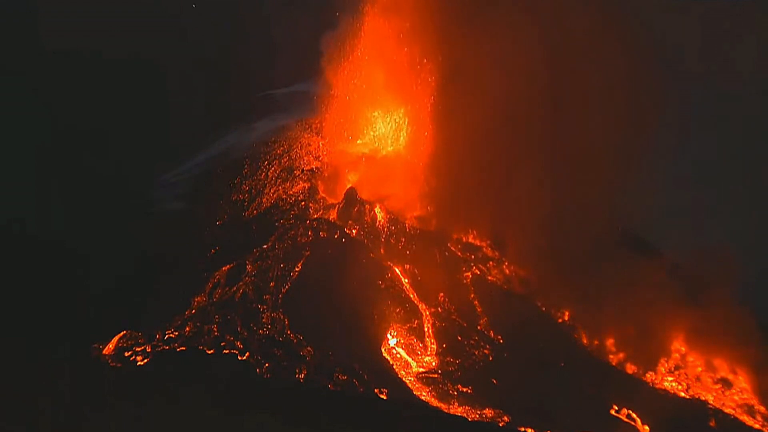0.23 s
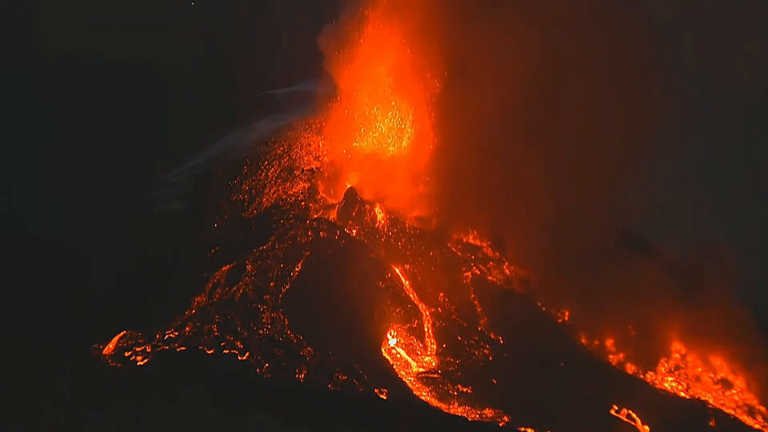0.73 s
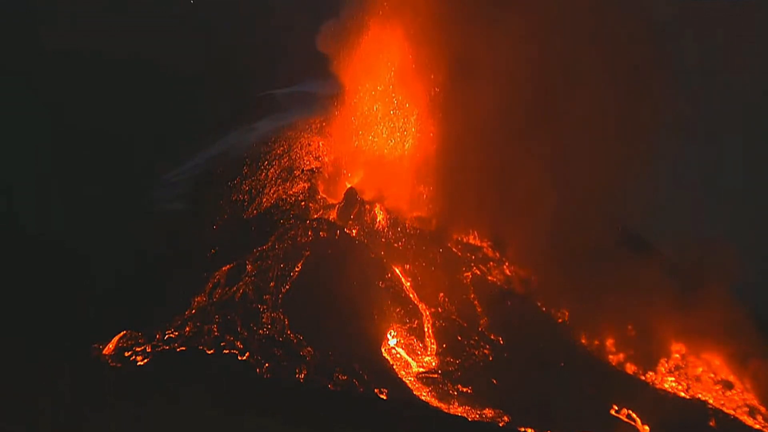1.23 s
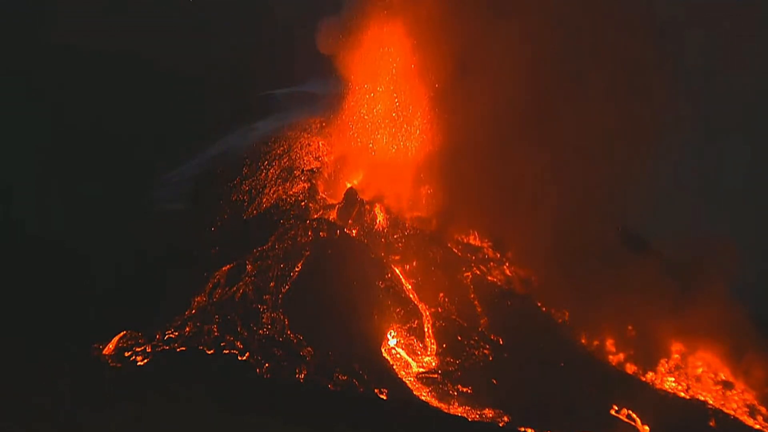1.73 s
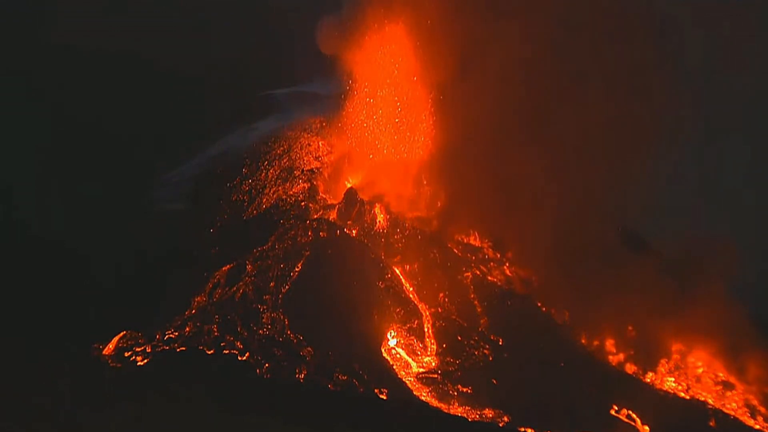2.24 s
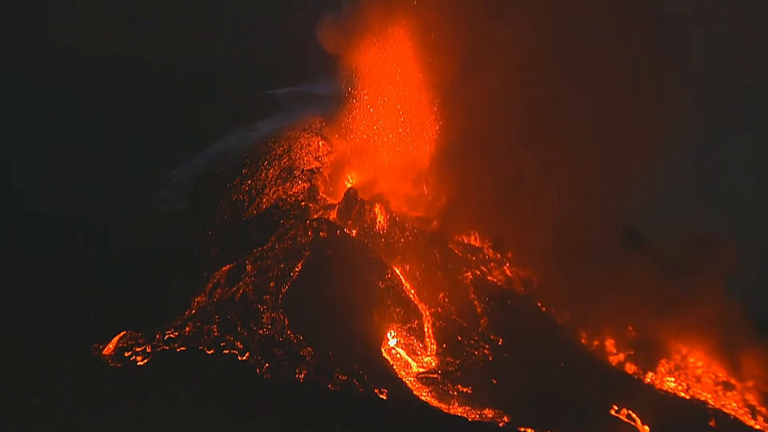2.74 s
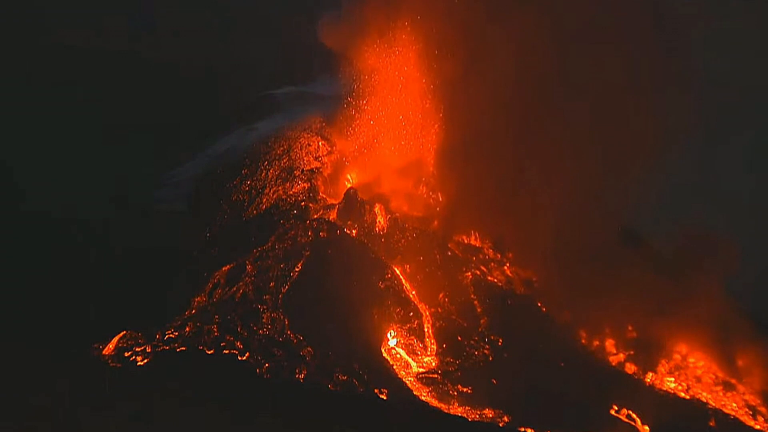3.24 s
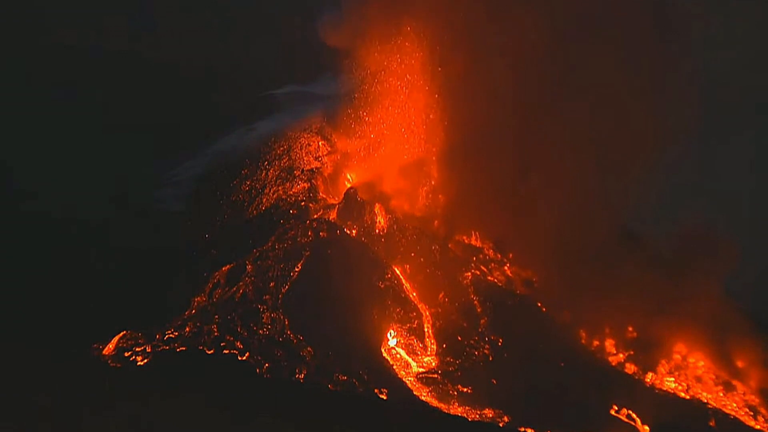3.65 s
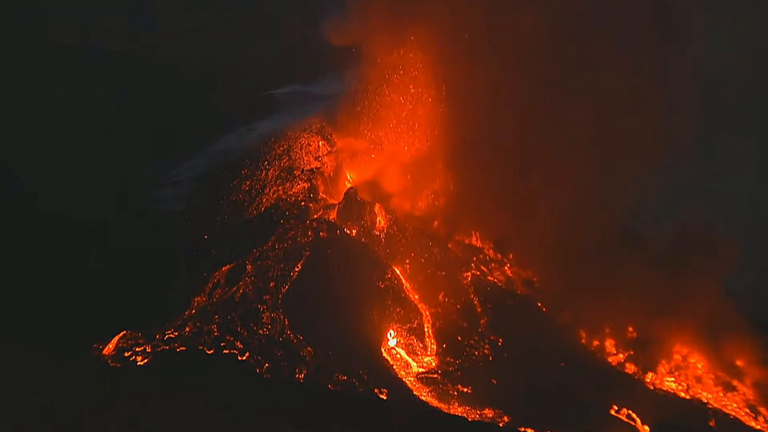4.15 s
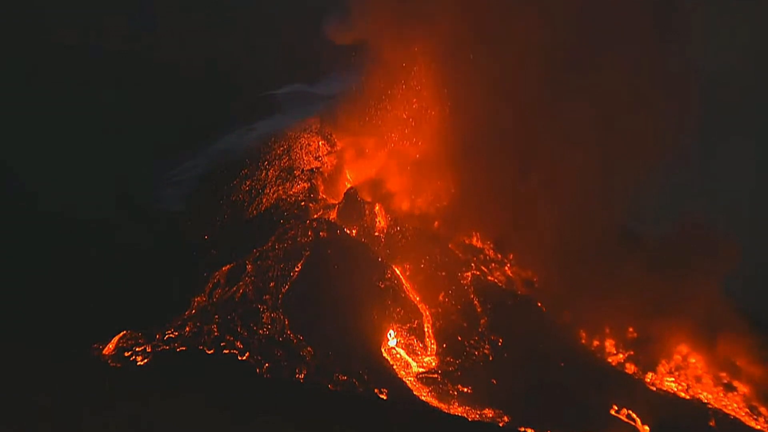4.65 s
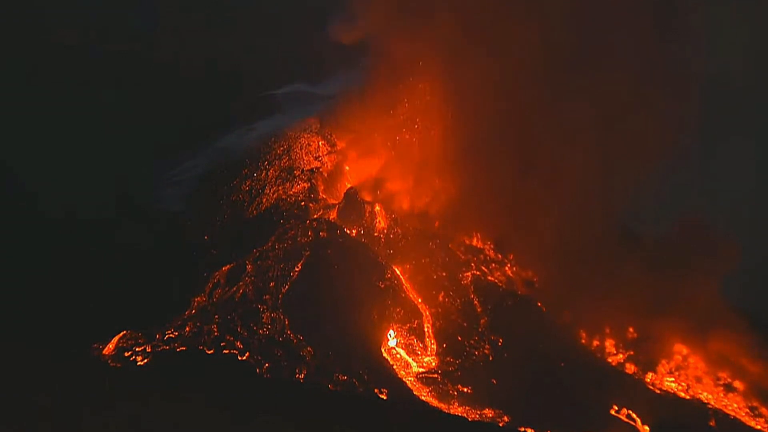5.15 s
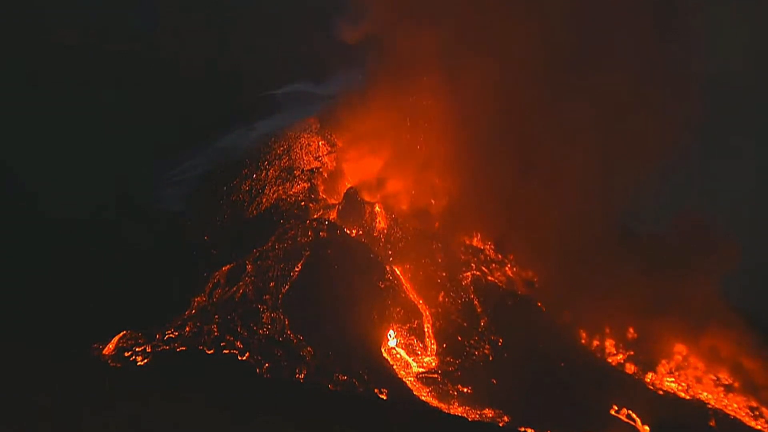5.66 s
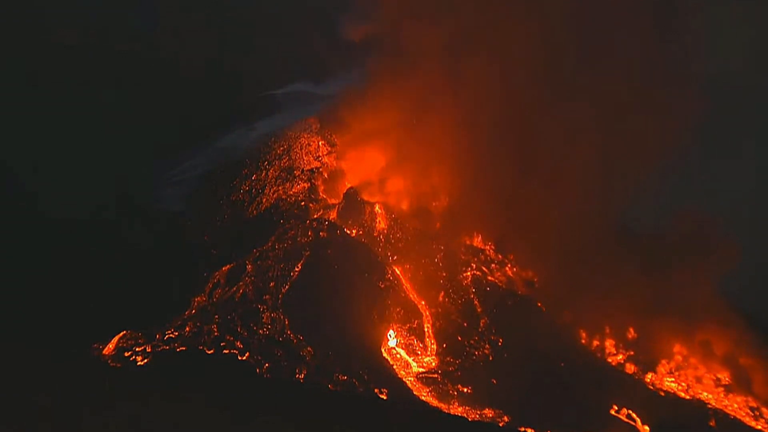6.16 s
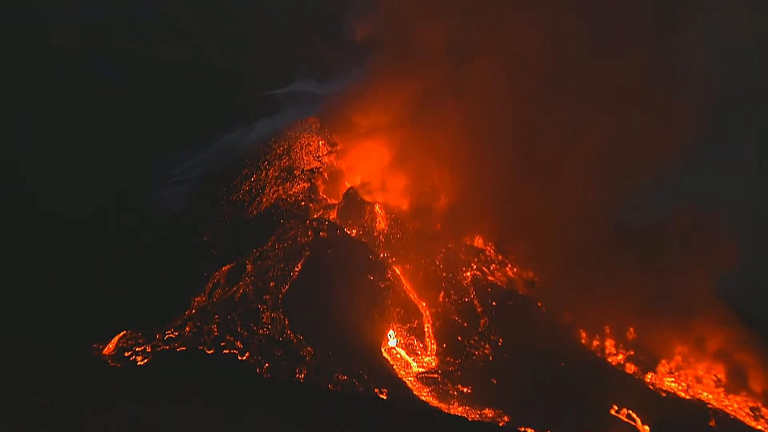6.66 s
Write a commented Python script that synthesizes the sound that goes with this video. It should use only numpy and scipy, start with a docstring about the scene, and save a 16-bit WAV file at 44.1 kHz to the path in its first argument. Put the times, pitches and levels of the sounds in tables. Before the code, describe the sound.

A distant volcano roars steadily with deep booming surges, while faint cinders patter and tick on top.

```python
"""Distant lava fountain at night

Escaping gas booms in a volcano's vent and roars above it; a cluster of short echoes spreads the
roar left and right. Air has soaked up the treble: only a faint patter of cinders with brief
crackling showers, a few small ticks and squeaks and a thin hiss lie on top."""
import sys
import numpy as np
from scipy import signal
from scipy.fft import rfft, irfft
from scipy.io import wavfile
from scipy.ndimage import uniform_filter1d

SR = 44100
rng = np.random.default_rng(int(sys.argv[2]) if len(sys.argv) > 2 else 0)


def store_pcm(level_fs):
    """Save levels as 16-bit WAV."""
    pcm = np.round(np.clip(level_fs, -1, 1) * 32767).astype(np.int16)
    wavfile.write(sys.argv[1], SR, np.atleast_2d(pcm).T)


N = 304731
TIME = np.arange(N) / SR
FREQS = np.maximum(np.fft.rfftfreq(N, 1 / SR), 1)


def undb(db):
    """Decibels to gain."""
    return 10 ** (np.asarray(db) / 20)


def unit(x):
    """Scale to rms 1."""
    return x / np.sqrt(np.mean(x ** 2))


def automation(points):
    """A level curve through (time, level) points, joined by straight lines."""
    return np.interp(TIME, *np.transpose(points))


def colour(points):
    """An EQ curve: gain at every frequency from (frequency [Hz], level [dB]) points."""
    hz, db = np.transpose(points)
    return undb(np.interp(np.log(FREQS), np.log(hz), db))


def resonance(hz, width):
    """Gain of a steep-sided resonance, 1 at its centre."""
    return 1 / (1 + ((FREQS ** 2 - hz ** 2) / (FREQS * width * np.pi / 2)) ** 2)


def peak_bank(rows):
    """Joint gain of several steep-sided peaks, added in power."""
    return np.sqrt(sum((undb(db) * resonance(hz, width)) ** 2 for hz, width, db in rows))


def noise(gain):
    """Noise of rms 1, its spectrum shaped by gain."""
    phases = np.exp(2j * np.pi * rng.random(len(FREQS)))
    return unit(irfft(gain * phases, N))


def sustained(x, span_s):
    """Level a signal so that its power stays even over spans longer than span_s."""
    size = max(int(span_s * SR), 1)
    power = uniform_filter1d(uniform_filter1d(x ** 2, size), size)
    return x / np.sqrt(power)


def walk(rate_hz):
    """Smooth random drift of rms 1: random steps at rate_hz, slewed twice."""
    hold = int(SR / rate_hz)
    steps = np.repeat(rng.standard_normal(N // hold + 1), hold)
    return unit(uniform_filter1d(uniform_filter1d(steps, hold), hold)[:N])


def hiss():
    """A thin, steady bed of treble noise."""
    # tone of the hiss: (frequency [Hz], relative level [dB])
    hiss_eq = [(2000, -17.5), (5000, -3.5), (5900, -9), (6600, -14), (7500, -6), (8600, -0.5), (9600, -7.5),
               (10500, -4.5), (11500, -3), (12800, 3.5), (15000, 1), (16000, -5.5)]
    return undb(-74.5) * noise(colour(hiss_eq))


def squeaks():
    """Short, thin, unsteady tones that swell, glide a little and fade."""
    # faint squeaks, some in a stutter: (start [s], length [s], level [dB], from pitch [Hz], to pitch [Hz])
    glides = [(1.588, 0.068, -69, 3400, 3390), (1.683, .03, -70, 3410, 3430), (1.696, .07, -71, 2940, 3000),
              (1.721, .017, -67, 3400, 3390), (1.742, .016, -67, 3390, 3430),
              (1.758, 0.02, -72, 3400, 3400)]
    jitter_hz, flutter_db = 28 * walk(500), 2 * walk(160)
    out = np.zeros(N)
    for start, length, db, from_hz, to_hz in glides:
        progress = np.clip((TIME - start) / length, 0, 1)
        pitch_hz = from_hz + (to_hz - from_hz) * progress + jitter_hz
        phase = 2 * np.pi * np.cumsum(pitch_hz) / SR
        out += undb(db + flutter_db) * np.sin(np.pi * progress) * np.sin(phase)
    return out


def ticks():
    """Each tick is a bright snap of contact and a short ring in one steep-sided resonance."""
    # small impacts: (time [s], ring level [dB], pitch [Hz], nominal width [Hz], decay [s], snap level [dB])
    impacts = [(.124, -55.5, 2850, 1150, 0.0052, -72), (.172, -71, 3900, 350, 0.022, -76),
               (.336, -69, 3050, 900, .011, -82), (.422, -66.5, 2980, 320, 0.018, -90),
               (.463, -74, 3450, 300, 0.035, -91), (1.12, -72.5, 3400, 450, 0.018, -85),
               (2.705, -70, 3450, 350, 0.01, -85), (2.87, -56, 2450, 1200, 0.0035, -63),
               (2.883, -69.5, 3300, 1000, 0.0044, -81), (4.824, -70, 3600, 354, 0.011, -92),
               (6.09, -76, 3600, 1210, 0.027, -82)]
    attack_s, snap_decay_s = 0.00019, 0.002
    snap_noise = sustained(noise(resonance(hz=4600, width=1350) ** 2), span_s=0.002)
    out = np.zeros(N)
    for start, ring_db, hz, width, decay_s, snap_db in impacts:
        age = np.maximum(TIME - start, 0)
        ring_noise = sustained(noise(resonance(hz, width) ** 2), span_s=0.0037)
        ring = undb(ring_db) * ring_noise * np.exp(-age / decay_s)
        snap = undb(snap_db) * snap_noise * np.exp(-age / snap_decay_s)
        out += (ring + snap) * (1 - np.exp(-age / attack_s))
    return out


def cinders():
    """Falling cinders blur into a fine, uneven patter; coarser showers crackle over it and die away."""
    # tone of the patter: (frequency [Hz], relative level [dB])
    patter_eq = [(1200, -12.5), (2300, 2), (2800, -0.5), (3400, 1.5), (3900, -3), (4500, -10.5),
                 (5600, -20), (7000, -49)]
    # tone of the showers: (frequency [Hz], relative level [dB])
    shower_eq = [(1200, -8.5), (2000, 6.5), (2500, 2.5), (3000, 1.5), (3800, -3.5), (4500, -11.5),
                 (5500, -20.5), (7000, -48)]
    # sudden showers of cinders: (start [s], level [dB], decay [s])
    showers = [(.16, -59.5, 0.058), (.325, -69, 0.07), (1.7, -70, .07), (1.76, -69.5, .04), (2.35, -72, .2),
               (2.86, -69.5, 1.1), (3.17, -74.5, .5)]
    patter_db, attack_s, stones_per_s = -76.5, 0.006, 1700
    shower_power = np.zeros(N)
    for start, db, decay_s in showers:
        age = np.maximum(TIME - start, 0)
        envelope = undb(db) * (1 - np.exp(-age / attack_s)) * np.exp(-age / decay_s)
        shower_power += envelope ** 2
    patter = noise(colour(patter_eq)) * undb(patter_db + 1.2 * walk(45))
    stones = np.sign(rng.standard_normal(N)) * (rng.random(N) < stones_per_s / SR)
    crackle = unit(irfft(rfft(stones) * colour(shower_eq), N))
    return patter + crackle * np.sqrt(shower_power)


def weak_echoes(age, count, first_s, last_s):
    """Taps for one side: equally weak reflections at random delays."""
    arrivals = rng.uniform(first_s, last_s, count)
    return undb(-24.5) * np.bincount(np.searchsorted(age, arrivals), minlength=len(age))


def echoes(x, distinct_db, scatter_db, onset_s, t60_s):
    """Distinct reflections and a scattered tail, different on each side; the bass stays in the centre."""
    # the clearest echoes: (delay [ms], channel [0 left, 1 right], relative level [dB])
    reflections = [(10.16, 0, -18), (17.26, 0, -14), (20.2, 1, -17), (22.47, 1, -17), (25.68, 0, -16),
                   (30.27, 1, -18), (34.58, 0, -18), (35.19, 1, -18)]
    # tone of the tail: (frequency [Hz], relative level [dB])
    tail_eq = [(60, -57), (150, -37.5), (245, -7), (300, -8.5), (390, -8.5), (500, 0), (680, 4), (820, 5.5),
               (1200, -2.5), (2000, 1), (3300, -7.5), (7000, -16)]
    age = TIME[:SR // 3]
    taps = np.array([weak_echoes(age, count=8, first_s=0.009, last_s=0.036) for side in range(2)])
    for ms, channel, db in reflections:
        taps[int(channel), round(ms * SR / 1000)] += undb(db)
    midrange = signal.butter(2, [400, 2130], "band", fs=SR, output="sos")
    distinct = rfft(signal.sosfilt(midrange, taps), N)
    bloom = 1 - np.exp(-(age / onset_s) ** 2)
    tail = rng.standard_normal(taps.shape) * bloom * undb(-60 * age / t60_s)
    tail /= np.sqrt(np.sum(tail ** 2, axis=1, keepdims=True))
    scattered = rfft(tail, N) * colour(tail_eq)
    scattered -= 0.5 * scattered.mean(axis=0)  # the tail comes more from the sides than from ahead
    response = undb(distinct_db) * distinct + undb(scatter_db) * scattered
    return irfft(rfft(x) * response, N)


def jet(roar_db):
    """The gas jet's roar: big eddies follow its strength, small ones swell a bit more and flutter faster."""
    # tone of the broad roar: (frequency [Hz], relative level [dB])
    jet_eq = [(100, -46.5), (260, -0.5), (380, -3), (520, -3), (660, -3), (800, -10), (1000, -12.5),
              (1300, -16.5), (1650, -23), (2050, -29.5), (2600, -43), (4000, -55), (7000, -87)]
    # narrow, steady peaks that colour the roar: (pitch [Hz], width [Hz], level against the broad roar [dB])
    jet_peaks = [(398, 12, 4.5), (461, 12, 4), (484, 12, -2.5), (550, 30, -1), (594, 24, 1), (652, 25, 0.5),
                 (693.7, 8.5, 2.5), (760, 11, -4), (808, 33, 4), (872, 44, -0.5), (920, 10, -1),
                 (982, 8.2, 5), (1025, 11, 5.5), (1092, 16, 4.5), (1154, 10, -2), (1193, 6.3, 1.5),
                 (1257, 8.3, 2), (1284, 12, 8), (1396, 9, 0), (1420, 13, -1.5), (1490, 41, -2),
                 (1550, 14, 1), (1639, 12, 1.5), (1760, 12, -1)]
    crossover_hz = 900
    small_share = 1 / (1 + (crossover_hz / FREQS) ** 4)  # share of the power in small eddies
    tone = colour(jet_eq) * np.hypot(1, peak_bank(jet_peaks))
    mean_db = np.mean(roar_db)
    big_db = roar_db - 0.78
    small_db = mean_db + 1.1 * (roar_db - mean_db) - 9.5
    big_eddies = noise(tone * np.sqrt(1 - small_share)) * undb(big_db + 0.23 * walk(8.8))
    small_eddies = noise(tone * np.sqrt(small_share)) * undb(small_db + 0.6 * walk(24))
    return big_eddies + small_eddies


def vent(effort_db):
    """Gas rings the vent's resonances over slow, deep pressure swells; each surge booms at its own pitch."""
    # build-up of the steady boom, a narrow low resonance of the vent: (time [s], level at mean effort [dB])
    boom_build = [(0, -50.5), (1.1, -44), (1.8, -43.5), (3, -42), (6.9, -41.5)]
    # the vent's other resonances, heard as rumble: (pitch [Hz], width [Hz], relative level [dB])
    rumble_modes = [(80.4, 15, -5), (101, 37, -7.5), (113.6, 42.6, -0.5), (149.4, 14, 2), (158.5, 10, -4.5),
                    (192.9, 10, -2.5), (209, 34, -10.5), (236, 20.7, -8)]
    # gas surges: (peak time [s], length [s], rumble lift [dB], boom level [dB], pitch [Hz], width [Hz])
    surges = [(0.076, 0.14, 0, -34.5, 150.3, 13), (0.197, .35, -0.5, -39, 78.7, 11),
              (0.452, 0.24, 1, -37, 188.6, 8.7), (.92, 0.35, -2, -36.5, 73, 12),
              (2.418, 0.22, -0.5, -32.5, 123, 15), (2.654, 0.36, 0, -36, 141.3, 12),
              (3.756, 0.29, -0.5, -37, 150.7, 16), (4.323, 0.27, -0.5, -28, 119, 6.5),
              (4.49, .14, -2, -34.5, 99, 12), (4.654, 0.3, 0.5, -30, 116.3, 9),
              (4.848, .16, 0.5, -36.5, 203, 25), (4.909, 0.29, 1.4, -29.5, 120.5, 19),
              (5.138, 0.13, 0, -33.5, 99, 10), (5.342, 0.17, 1, -35, 111.5, 18),
              (6.059, .26, -0.5, -30, 131.5, 16), (6.545, 0.4, 0.6, -35.5, 146.6, 23),
              (6.721, .2, 1, -40, 252, 55)]
    # the deepest pressure swells: (time [s], relative level [dB])
    swells = [(0, -42), (0.5, -46.5), (1, -39.5), (1.4, -43), (2.2, -43), (2.6, -43.5), (3.1, -43),
              (3.9, -41.5), (4.4, -48.5), (5.2, -42), (5.5, -44), (6.3, -41.5), (6.9, -46)]
    # tone of those swells: (frequency [Hz], relative level [dB])
    swell_eq = [(12, -26.5), (22, -9), (32, 0), (44, 8.5), (57, 4), (80, -0.5), (120, 3), (300, -65),
                (1000, -130)]
    drive_db = 0.63 * effort_db  # the vent swells less than the roar does
    rumble_db = -32 + drive_db
    boom = sustained(noise(resonance(hz=118.4, width=9.4)), span_s=0.13)
    boom *= undb(automation(boom_build) + drive_db)
    for peak_s, length, lift_db, boom_db, hz, width in surges:
        surge = np.exp(-(2 * (TIME - peak_s) / length) ** 2)
        rumble_db += lift_db * surge
        boom += sustained(noise(resonance(hz, width)), span_s=0.064) * undb(boom_db) * surge
    rumble = sustained(noise(peak_bank(rumble_modes)), span_s=0.094) * undb(rumble_db + 0.82 * walk(14))
    deep = sustained(noise(colour(swell_eq)), span_s=0.2) * undb(automation(swells) + 3.5)
    return rumble + boom + deep


def scene():
    """Vent, jet and small sounds straight ahead, their echoes around them, and a thin hiss."""
    # strength of the eruption: (time [s], nominal roar level [dB])
    eruption = [(0.05, -36), (0.3, -37.5), (0.8, -37.5), (1.05, -37.5), (1.5, -39.5), (2.1, -38.5),
                (2.35, -39), (3.0, -39), (3.3, -38.5), (3.55, -39.5), (4.1, -37.5), (4.45, -38.5),
                (4.78, -37), (5.05, -37), (5.5, -39), (6.2, -38), (6.85, -37.5)]
    roar_db = automation(eruption)
    effort_db = roar_db - np.mean(roar_db)
    direct = vent(effort_db) + jet(roar_db) + cinders() + ticks() + squeaks()
    return direct + hiss() + echoes(direct, distinct_db=-7.0, scatter_db=-3.5, onset_s=0.0099, t60_s=0.3)


def record(dry):
    """A short fade at each end and a steep high cut."""
    fade_s, top_hz = 0.004, 15400
    fades = np.minimum(np.minimum(TIME, TIME[-1] - TIME) / fade_s, 1)
    high_cut = signal.ellip(10, 0.1, 80, top_hz, fs=SR, output="sos")
    return signal.sosfilt(high_cut, dry * fades)


dry = scene()
out = record(dry)
store_pcm(out)
```